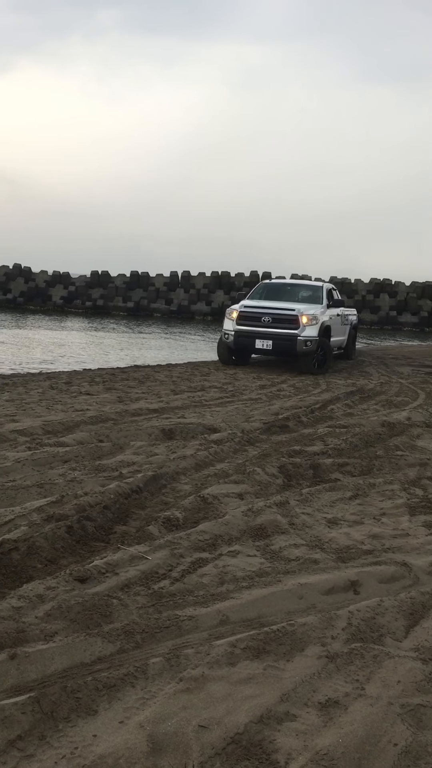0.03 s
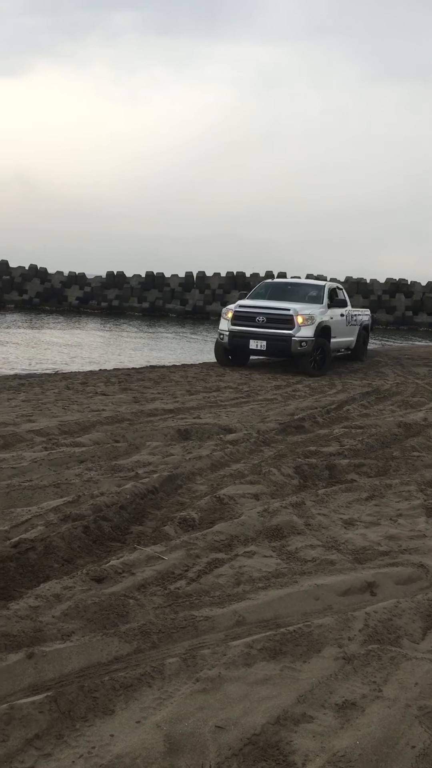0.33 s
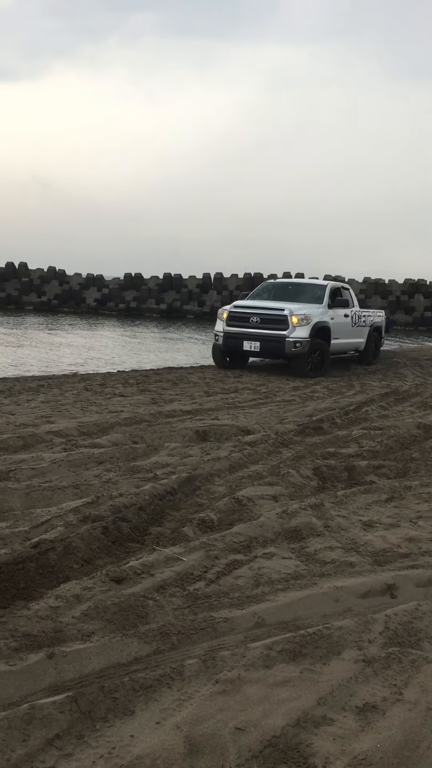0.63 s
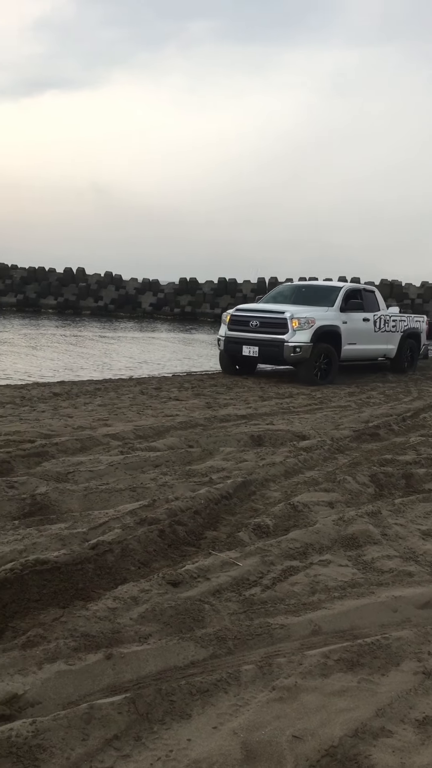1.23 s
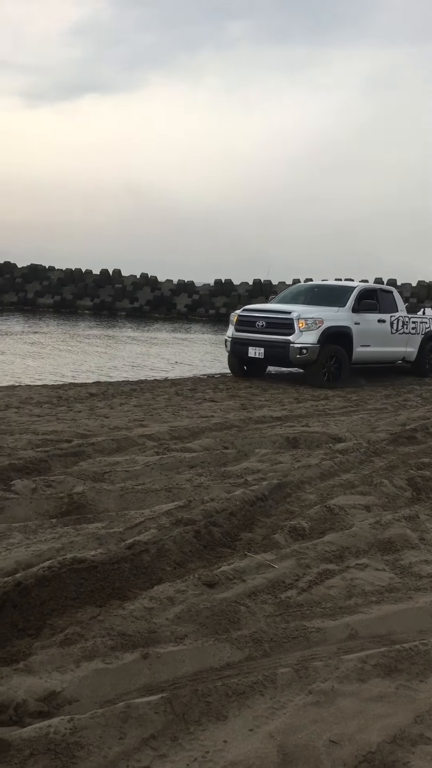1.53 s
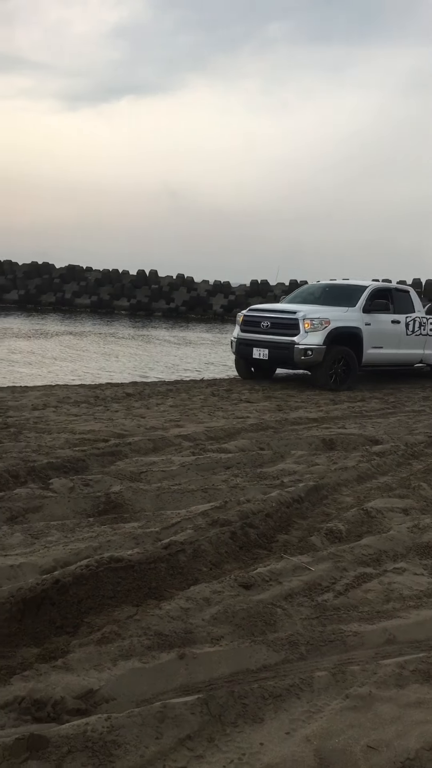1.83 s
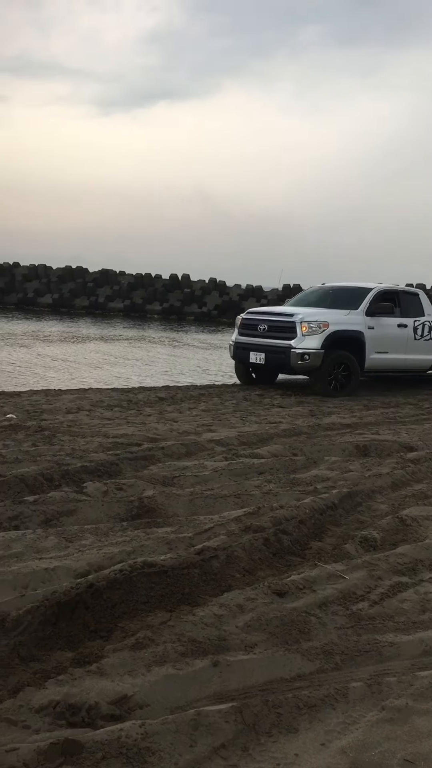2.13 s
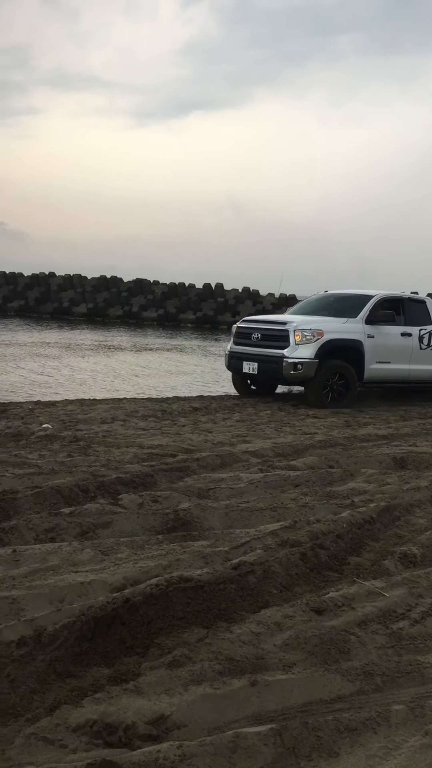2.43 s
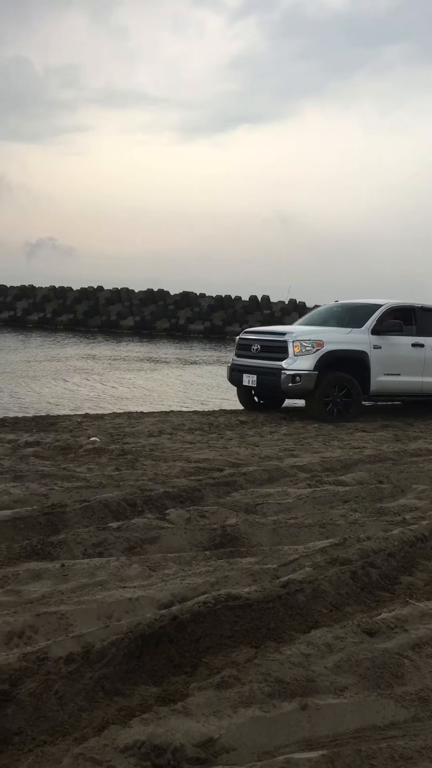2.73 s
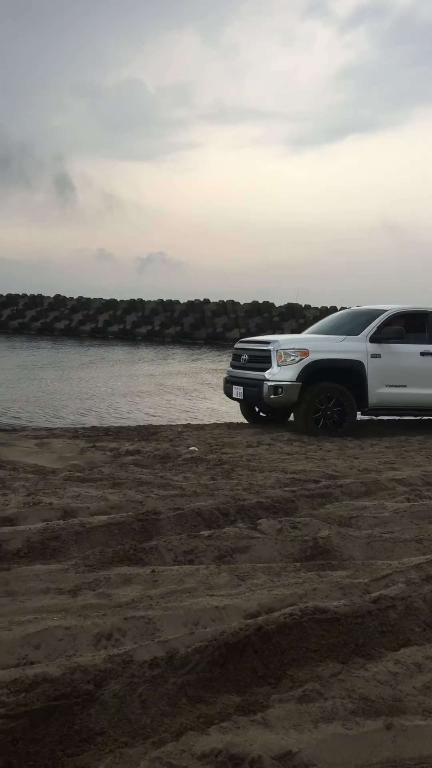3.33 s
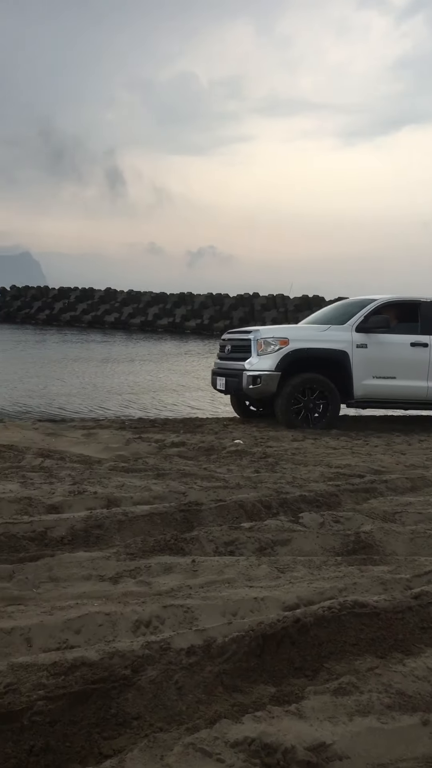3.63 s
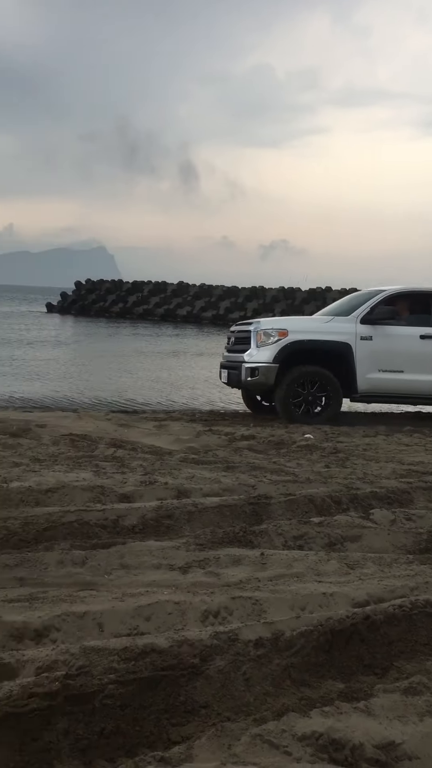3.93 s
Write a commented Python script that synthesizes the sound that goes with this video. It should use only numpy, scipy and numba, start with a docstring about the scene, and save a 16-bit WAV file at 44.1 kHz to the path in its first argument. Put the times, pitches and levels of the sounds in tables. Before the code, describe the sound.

A pickup truck creeps closer over beach sand, its low engine hum slowly rising in pitch as the tyres crunch. Wind rumbles on the microphone, gusting harder in the second half, while water hisses softly behind.

```python
"""A pickup truck creeps closer over beach sand, with water hissing behind it.
From the start its exhaust hums, its tyres crunch and its engine bay rushes and rings faintly,
while wind rumbles on the microphone and a thin, high sizzle fades away. The hum slowly rises in
pitch as the engine speeds up. In the second half the gusts grow louder and brighter, and the
crunch and rush of the truck are strongest near the end."""
import sys
import numpy as np
from scipy import signal
from scipy.fft import rfft, irfft
from scipy.io import wavfile
from scipy.ndimage import uniform_filter1d
from numba import njit

SR = 44100
rng = np.random.default_rng(int(sys.argv[2]) if len(sys.argv) > 2 else 0)


def output_pcm(signal):
    """Save a mono or channel-first signal as 16-bit PCM at the path in sys.argv[1].

    Samples are clipped to [-1, 1] before scaling.
    """
    pcm = np.clip(np.atleast_2d(signal).T, -1, 1) * 32767
    wavfile.write(sys.argv[1], SR, np.round(pcm).astype(np.int16))


N = 176400
T = np.arange(N) / SR

# Levels in these tables are relative: the functions below set the final loudness.
# tone colour of the water along the shore: (frequency [Hz], level [dB])
WATER_SPECTRUM = [(100, -40), (500, 9), (1500, 1), (3000, -2), (7000, -45), (15000, -23)]
# strength of the gusts: (time [s], level [dB])
GUST_LEVELS = [(0, -57), (.88, -46.5), (1.06, -70), (1.13, -41), (1.22, -51), (1.34, -43), (1.5, -53),
               (1.69, -63), (1.725, -29), (1.748, -37), (1.78, -43), (1.83, -37), (1.86, -29.5),
               (1.955, -30), (1.99, -34.5), (2.03, -53), (2.19, -42.5), (2.45, -32), (2.62, -33.5),
               (2.88, -32), (3.02, -30.5), (3.11, -24), (3.158, -35), (3.185, -23.5), (3.24, -25.5),
               (3.29, -36), (3.34, -29), (3.41, -55), (3.57, -46), (3.78, -37), (3.84, -30.5),
               (3.92, -28.5), (4, -30.5)]
# loudness of the deep wind rumble: (time [s], level [dB])
RUMBLE_LEVELS = [(0, -37.5), (.25, -46.5), (.35, -39.5), (.72, -39), (.87, -30.5), (1.03, -39),
                 (1.65, -35.5), (1.97, -33.5), (2.06, -39.5), (2.4, -38.5), (3.1, -43), (3.25, -30),
                 (3.42, -40.5), (3.53, -28.5), (3.78, -35.5), (3.9, -28.5), (4, -49)]
# tone colour of that rumble: (frequency [Hz], level [dB])
RUMBLE_SPECTRUM = [(20, -38), (32, -36), (52, -7), (70, -5), (100, -4.5), (150, -8.5), (300, -71),
                   (1000, -92)]
# loudness of the wind's fluttering boom: (time [s], level [dB])
BOOM_LEVELS = [(0, -42.5), (1.0, -44.5), (1.6, -39), (1.69, -40.5), (1.735, -28), (1.82, -35.5),
               (2.08, -47.5), (2.2, -29.5), (2.32, -32.5), (2.67, -25.5), (2.705, -21.5), (2.77, -24.5),
               (2.88, -43), (2.96, -26), (3.16, -30), (3.235, -28), (3.33, -31), (3.43, -36), (3.56, -25.5),
               (3.88, -27.5), (4, -45)]
# single sharp thumps of wind: (time [s], peak level [dB], frequency [Hz])
BUFFETS = [(0.878, -16.5, 108), (0.97, -18, 95), (1.121, -20, 154), (1.340, -28, 220), (1.73, -13.5, 165),
           (1.7394, -10.5, 198), (1.747, -14.5, 300), (1.855, -9, 131), (1.859, -23, 500),
           (1.878, -31, 242), (1.906, -15, 533), (1.910, -9, 320), (1.95, -21, 304), (1.984, -19, 101),
           (2.267, -20, 160), (2.377, -13, 168), (2.433, -24, 250), (2.586, -18.5, 305),
           (2.640, -18.5, 230), (2.671, -11.5, 169), (2.976, -10.5, 136), (3.017, -11.5, 175),
           (3.047, -19, 363), (3.088, -16, 220), (3.098, -9, 238), (3.131, -14.5, 372), (3.177, -9, 360),
           (3.216, -17.5, 350), (3.242, -10, 183), (3.327, -18.5, 368), (3.881, -17, 380),
           (3.891, -13.5, 222), (3.919, -10, 122), (3.931, -16, 400)]
# how near the truck is, given as loudness: (time [s], level [dB])
NEARNESS = [(0, -59.5), (.6, -57.5), (1.1, -55), (2.2, -53), (3, -51.5), (3.5, -51), (4, -49)]
# echoes off the truck's body and the ground: (starting delay [s], level [dB])
ECHOES = [(.0051, -21.5), (.0094, -15)]
# tone colour of the sand under the tyres: (frequency [Hz], level [dB])
SAND_SPECTRUM = [(1500, -20), (3000, 6), (3800, -2), (4100, 1.5), (4500, 2), (4850, -3), (5350, 1),
                 (6500, -0.5), (7300, -6.5), (8000, -6), (9400, -2), (10000, -6), (10400, -11), (11200, -7),
                 (12300, -7.5), (13300, -11.5), (15600, -20)]
# small swells in the sand's hiss: (time [s], added level [dB])
SAND_SWELLS = [(0, -1.5), (1.67, -1.2), (2.06, -1.5), (2.17, 0), (2.36, -0.7), (2.57, -2), (3.3, -0.5),
               (3.52, -0.5), (4, -2)]
# tone colour of the rushing fan and belts: (frequency [Hz], level [dB])
FAN_SPECTRUM = [(300, 1), (800, 0), (1300, 4.5), (1750, 2), (2050, 2.5), (2270, -2), (2520, 3),
                (3100, -14.5), (3800, -14.5), (5000, -21), (9000, -48)]
# narrow bands where the engine bay rings: (frequency [Hz], width [Hz], level [dB])
BAY_RINGS = [(995, 45, -61), (1470, 84, -59.5)]
# two faint whines from the engine bay: (time [s], pitch [Hz], level [dB])
LOW_WHINE = [(0, 990, -61), (.9, 985, -68), (1.5, 980, -57), (3.4, 984, -79), (3.62, 991, -49.5),
             (4, 956, -55)]
HIGH_WHINE = [(0, 1446, -61), (.6, 1450, -77), (.95, 1430, -55.5), (1.86, 1467, -61.5), (2.45, 1440, -69),
              (2.72, 1433, -50.5), (2.84, 1455, -56), (2.97, 1420, -51.5), (3.28, 1422, -58),
              (3.55, 1430, -65), (4, 1430, -61)]
# engine speed and loudness of its hum: (time [s], firing rate [Hz], level [dB])
ENGINE = [(0, 105.5, -29.5), (.36, 107, -26), (.6, 110.5, -28.5), (.85, 114, -34.5), (.96, 115, -48),
          (1.12, 117, -26.5), (1.3, 118.5, -35), (1.75, 122.5, -33.5), (2.1, 129, -40), (2.6, 133, -32.5),
          (2.97, 137, -32.5), (3.15, 138, -33), (3.55, 139.5, -33.5), (4, 140, -37)]
# tones that make up the hum: (frequency [times the firing rate], level [dB])
EXHAUST_TONES = [(1, 4), (1.252, -16), (1.5, -15.5), (1.752, -27), (2.002, -32)]


def from_db(db):
    """Turn decibels into a number to multiply a sound by."""
    return 10 ** (np.asarray(db) / 20)


def rms_one(x):
    """Scale a sound so that its average strength (rms) is 1."""
    return x / np.sqrt(np.mean(x ** 2) + 1e-20)


def evened(x, size):
    """Hold the strength near 1 over stretches of `size` samples."""
    power = uniform_filter1d(uniform_filter1d(x ** 2, size), size)
    return x / np.sqrt(power + 1e-20)


def in_time(rows):
    """Join a table's points with straight lines, giving each column a value at every sample."""
    times, *columns = np.transpose(rows)
    return [np.interp(T, times, column) for column in columns]


def noise():
    """Plain, even hiss (white noise)."""
    return rng.standard_normal(N)


def drift(hz):
    """A smooth random wobble of typical size 1; higher hz makes it quicker."""
    hop, warm_up = 40, 2000   # in samples, in hops
    memory = np.exp(-2 * np.pi * hop * hz / SR)
    kicks = rng.standard_normal(N // hop + warm_up + 2)
    slow = signal.lfilter([1], [1, -2 * memory, memory ** 2], kicks)[warm_up:]
    return np.interp(np.arange(N) / hop, np.arange(len(slow)), rms_one(slow))


def coloured(x, spectrum):
    """Give a sound the tone colour in a table, at strength 1."""
    hz, db = np.transpose(spectrum)
    bins_hz = np.arange(N // 2 + 1) * SR / N + 1
    gains = from_db(np.interp(np.log(bins_hz), np.log(hz), db))
    return rms_one(irfft(rfft(x) * gains, N))


def resonance(x, hz, width_hz):
    """Make a sound ring around one frequency, at strength 1."""
    r = np.exp(-np.pi * width_hz / SR)
    return rms_one(signal.lfilter([1, 0, -1], [1, -2 * r * np.cos(2 * np.pi * hz / SR), r * r], x))


def passed(x, side, hz, order):
    """Keep the "low" or "high" side of hz; a higher order cuts more steeply."""
    return signal.sosfilt(signal.butter(order, hz, side, fs=SR, output="sos"), x)


@njit
def moving_lowpass(x, step, damping):
    """Dull a sound by a changing amount: a bigger step lets more treble through."""
    out, low, band = np.zeros(len(x)), 0., 0.
    for i in range(len(x)):
        band += step[i] * (x[i] - low - damping * band)
        low += step[i] * band
        out[i] = low
    return out


def water():
    """Small waves wash the shore with a smooth, gently wavering hiss."""
    return from_db(-54.5 + drift(hz=6)) * coloured(noise(), WATER_SPECTRUM)


def sizzle():
    """A thin, high hiss that fades out at the start."""
    hz, width_hz, fade_db_per_s = 11450, 700, 22
    band = resonance(resonance(noise(), hz, width_hz), hz, width_hz)
    return from_db(-69 - fade_db_per_s * T) * band


def wind_gusts():
    """Swirls of air hit the microphone over a deep rumble; stronger wind is louder and brighter."""
    gust_db, = in_time(GUST_LEVELS)
    force_db = gust_db - gust_db.mean() + 2.26 * drift(hz=59)
    tuning_hz = np.clip(240 * from_db(0.5 * force_db), 60, 900)   # swirls shrink as the wind rises
    step, damping = 2 * np.pi * tuning_hz / SR, 4.43
    lumpy_flow = noise() * from_db(2 * drift(hz=160))
    swirls = moving_lowpass(moving_lowpass(lumpy_flow, step, damping), step, damping)
    swirls = passed(swirls, "high", hz=98.6, order=2)
    swirls = passed(swirls, "low", hz=697, order=6)   # the smallest swirls set this limit
    gusts = from_db(-36.5 + 0.84 * force_db) * evened(swirls, size=900)
    rumble_db, = in_time(RUMBLE_LEVELS)
    return gusts + from_db(5.5 + rumble_db) * coloured(noise(), RUMBLE_SPECTRUM)


def wind_boom():
    """Wind makes the microphone's opening ring with a broad, fluttering boom."""
    hz, width_hz, flutter_db = 153.3, 101.7, 3.5
    level_db, = in_time(BOOM_LEVELS)
    boom = resonance(resonance(noise(), hz, width_hz), hz, width_hz)
    return from_db(level_db + flutter_db * drift(hz=15.7)) * evened(boom, size=1500)


def wind_buffets():
    """Single swirls hit the microphone: each is one short push with a dip before and after."""
    thumps = np.zeros(N)
    for time, db, hz in BUFFETS:
        gap_squared = np.minimum((np.pi * hz * (T - time)) ** 2, 50)
        thumps += from_db(db) * (1 - 2 * gap_squared) * np.exp(-gap_squared)
    return thumps


def with_echoes(x):
    """Add short echoes off the body and the ground; their detours lengthen as the truck nears."""
    stretch = 1 + 0.0121 * T
    return x + sum(from_db(db) * np.interp(T - delay * stretch, T, x) for delay, db in ECHOES)


def tyres(near_db):
    """Clumps of sand crack over a fine hiss, louder and brighter as the truck nears."""
    grains_per_s, spread_db, grain_share = 3500, 1.5, 0.33
    sizes = from_db(spread_db * np.minimum(rng.exponential(1, N), 5)) * rng.choice([-1, 1], N)
    cracks = rng.random(N) < grains_per_s * from_db(2 * drift(hz=22)) / SR
    crunch = np.sqrt(grain_share) * rms_one(sizes * cracks)
    hiss = np.sqrt(1 - grain_share) * noise()
    sand = coloured(crunch + hiss, SAND_SPECTRUM)
    dull = passed(sand, "low", hz=7000, order=1)
    treble = (sand - dull) * from_db(0.33 * near_db)
    swell_db, = in_time(SAND_SWELLS)
    crumble_db = 0.9 * drift(hz=38)   # the crust gives way unevenly
    return from_db(-53 + near_db + swell_db + crumble_db) * (dull + treble)


def engine_bay(firings, near_db):
    """The fan and belts rush and the bay rings, all throbbing each time the engine fires."""
    throb = 1 + 0.13 * np.cos(2 * np.pi * firings)
    rush = from_db(-49) * coloured(throb * noise(), FAN_SPECTRUM)
    rings = sum(from_db(db) * resonance(throb * noise(), hz, width) for hz, width, db in BAY_RINGS)
    return (rush + rings) * from_db(0.8 * near_db)


def whines():
    """Two thin tones from the engine bay come and go and wander in pitch."""
    tones = np.zeros(N)
    for hz, db in (in_time(LOW_WHINE), in_time(HIGH_WHINE)):
        pitch_hz = hz + 5.5 * drift(hz=15.2)
        tones += from_db(db) * np.sin(2 * np.pi * np.cumsum(pitch_hz) / SR)
    return tones


def exhaust(firings, hum_db):
    """The engine's firings blend into one strong tone; uneven cylinders add weaker ones."""
    hum = np.zeros(N)
    for multiple, db in EXHAUST_TONES:
        wavering = from_db(db - 2.5 * drift(hz=1.17))
        hum += wavering * np.sin(2 * np.pi * (multiple * firings + rng.random()))
    flutter_db = 0.3 * drift(hz=42)   # the hum trembles in the moving air
    return from_db(hum_db - flutter_db) * rms_one(hum)


def scene():
    """Shore, wind and truck, heard at one microphone."""
    firing_hz, hum_db = in_time(ENGINE)
    unsteady_hz = firing_hz * (1 + 0.0024 * drift(hz=2.64))
    firings = np.cumsum(unsteady_hz) / SR   # how many times the engine has fired so far
    near_db, = in_time(NEARNESS)
    near_db -= near_db.mean()
    wind = wind_gusts() + wind_boom() + wind_buffets()
    wind = 0.27 * np.tanh(wind / 0.38)   # the microphone's opening softly squashes big peaks
    truck = exhaust(firings, hum_db) + whines()
    truck += with_echoes(engine_bay(firings, near_db) + tyres(near_db))
    return (water() + sizzle() + wind + truck)[None]


def record(dry):
    """Soften the deepest bass and cut off the highest treble."""
    thinned = passed(dry, "high", hz=28, order=3)
    top_hz = 15700
    return signal.sosfilt(signal.ellip(12, .2, 80, top_hz, fs=SR, output="sos"), thinned)


dry = scene()
out = record(dry)
output_pcm(out)
```